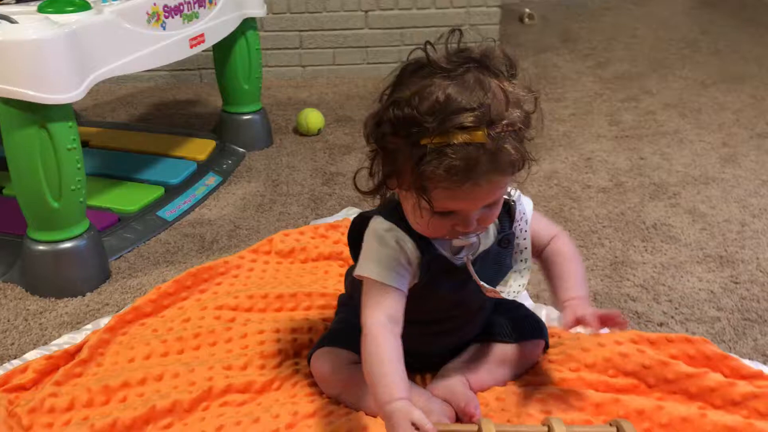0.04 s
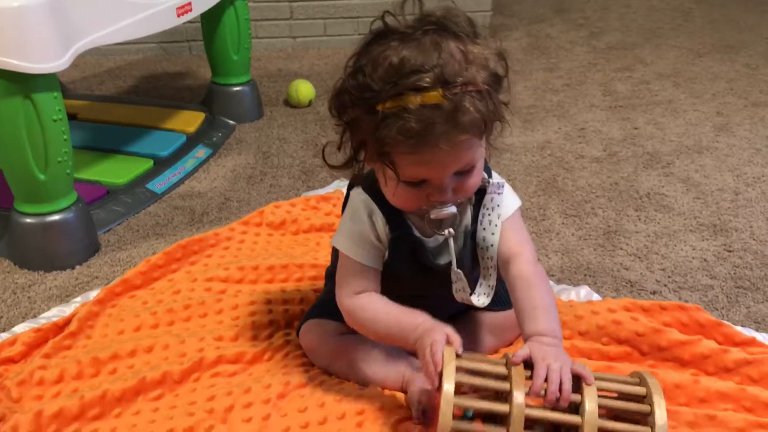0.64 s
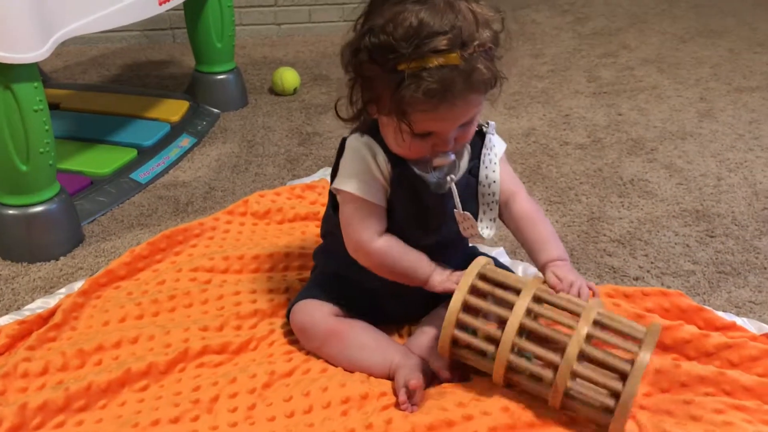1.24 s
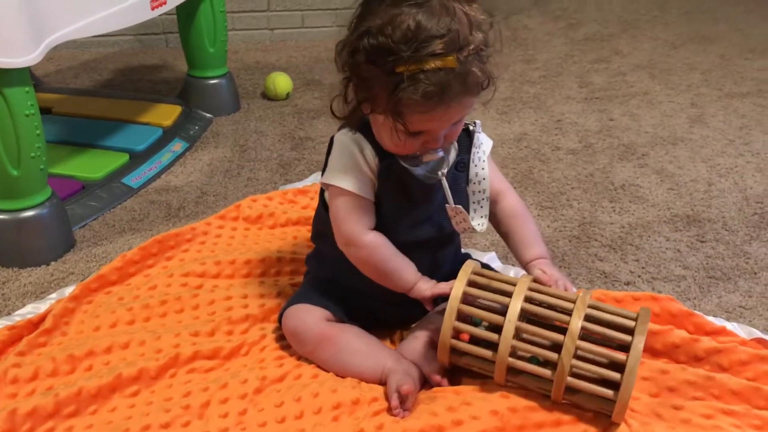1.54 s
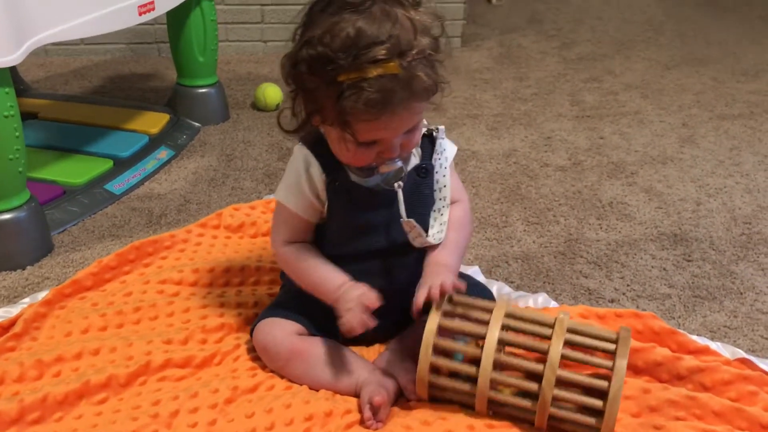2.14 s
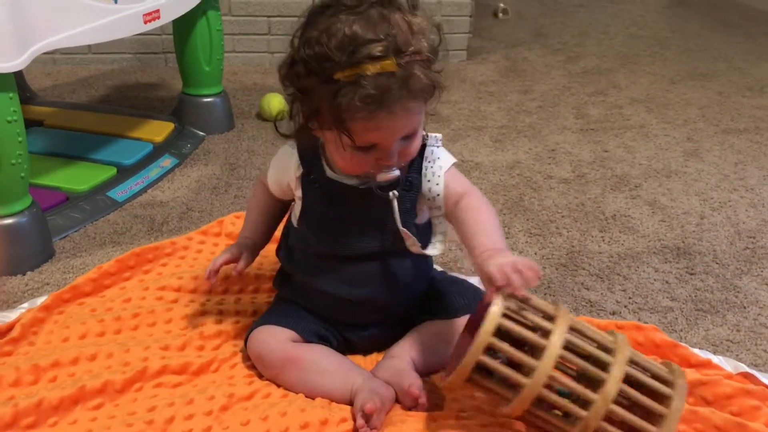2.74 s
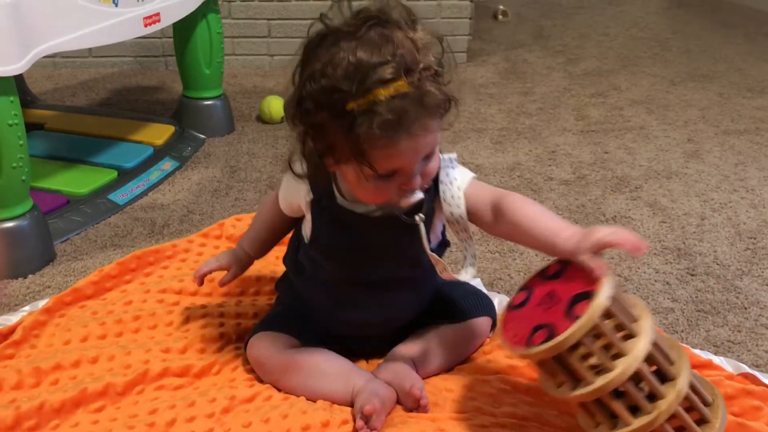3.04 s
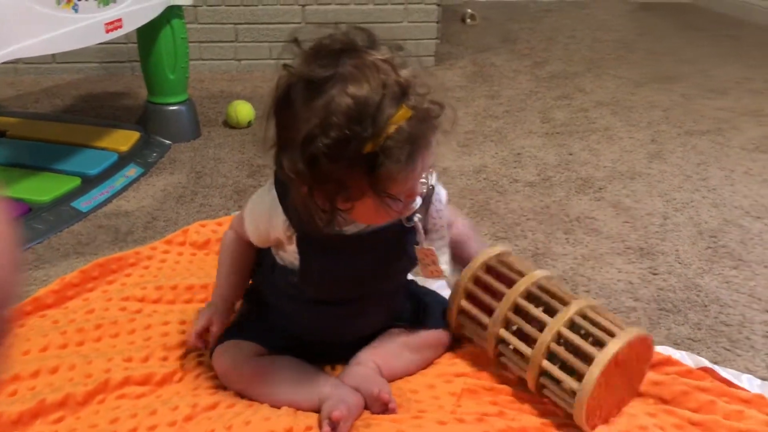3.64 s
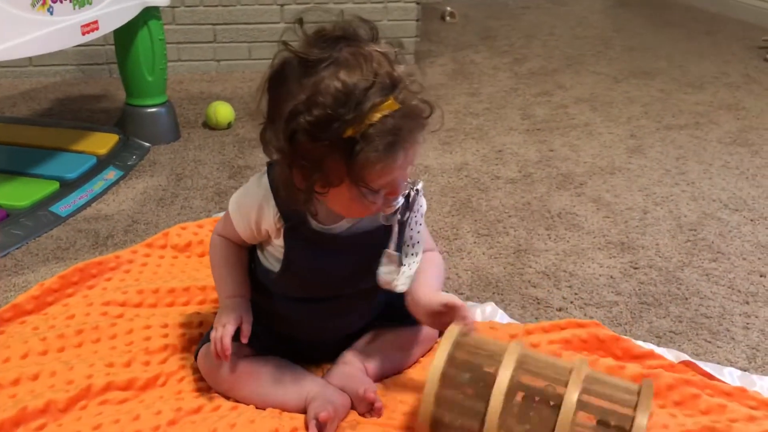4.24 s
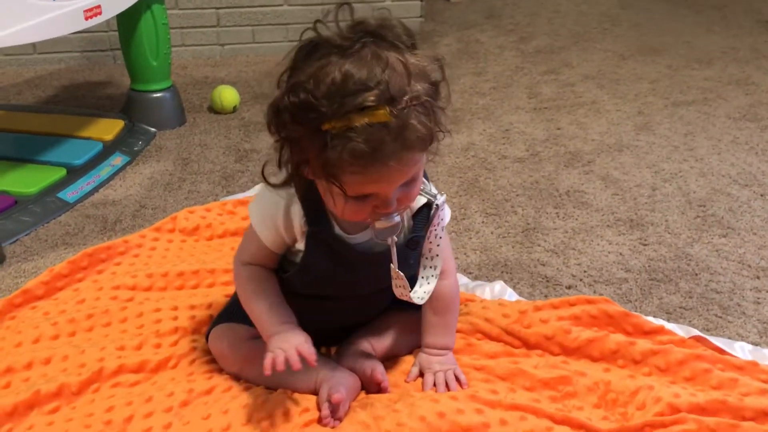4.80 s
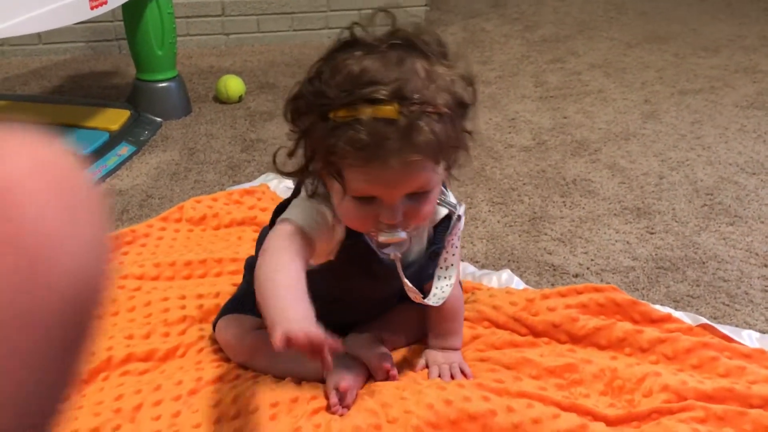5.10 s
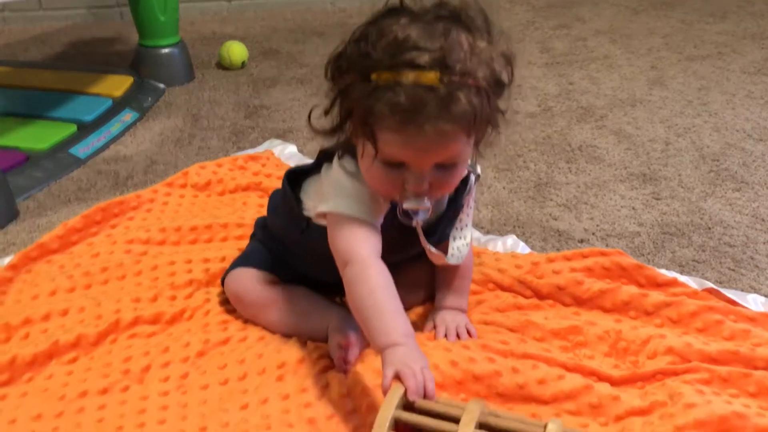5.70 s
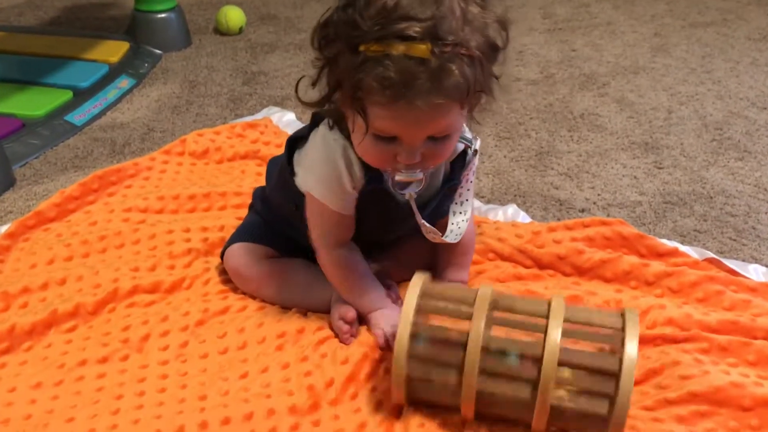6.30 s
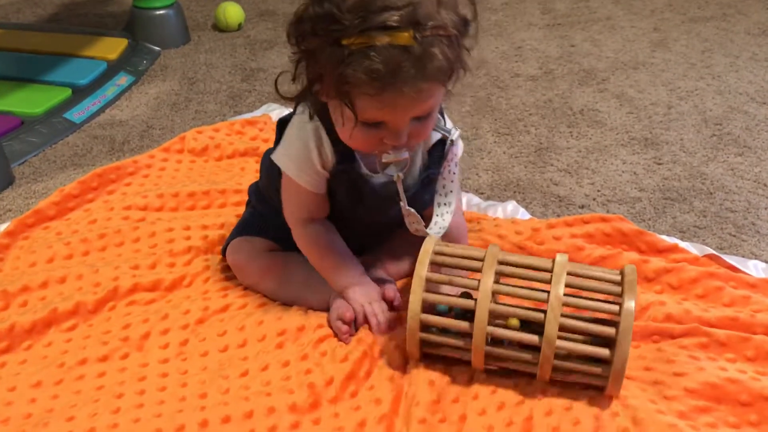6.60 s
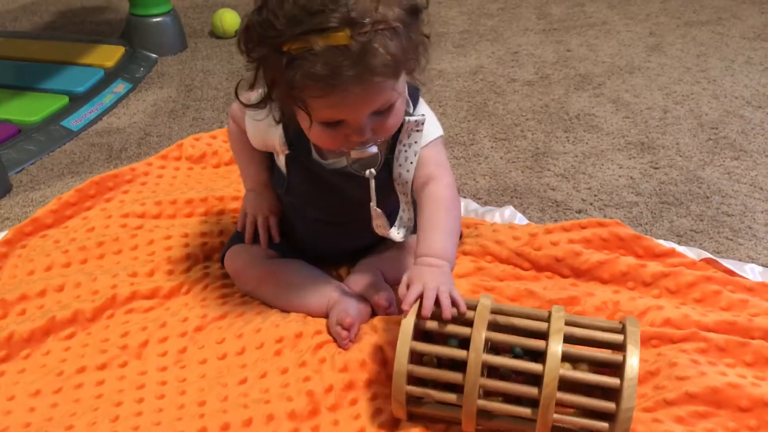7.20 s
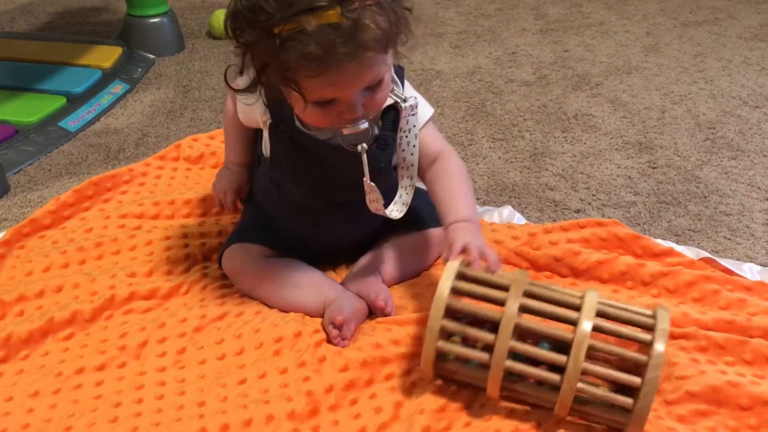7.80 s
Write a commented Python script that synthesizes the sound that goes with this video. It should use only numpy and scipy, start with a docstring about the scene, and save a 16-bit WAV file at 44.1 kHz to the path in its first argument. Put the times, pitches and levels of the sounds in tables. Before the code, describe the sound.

In a quiet carpeted room, beads tumble through a wooden rainmaker close to the microphone. After some faint metal clinks and echoing bangs further off, the first rattle swells and trickles away. Hands brush softly over the toy, then longer, louder pours follow, with a quick cluster of ringing wooden taps. One more bright rush of beads and a smaller rattle die down into scattered clicks.

```python
"""Over a faint house rumble, something clinks and bangs a few times in an echoing room further off.
Close by, a toddler tips and rolls a wooden rainmaker on a blanket: every tilt sends beads down between
its rods in a pour that swells, runs down and dulls, until the last ones drop in single clicks.
Each bead rings a rod and the wooden cage around it. Hands slide over wood and cloth between pours."""
import sys
import numpy as np
from scipy import signal
from scipy.fft import rfft, irfft, next_fast_len
from scipy.io import wavfile
from scipy.ndimage import uniform_filter1d

SR = 44100
rng = np.random.default_rng(int(sys.argv[2]) if len(sys.argv) > 2 else 0)


def waveform_to_disk(signal):
    """Save audio, clipped to [-1, 1], as 16-bit WAV at the path in sys.argv[1]."""
    frames = np.transpose(np.atleast_2d(signal))
    scaled = np.clip(frames, -1, 1) * 32767
    samples = np.round(scaled).astype(np.int16)
    wavfile.write(sys.argv[1], SR, samples)


N = 350595
TIME = np.arange(N) / SR
GRAIN = 1024  # samples in one contact


def amp(db):
    """Decibels to gain."""
    return 10 ** (np.asarray(db) / 20)

def unit(x):
    """Each row at rms 1."""
    return x / np.sqrt(np.mean(x ** 2, axis=-1, keepdims=True) + 1e-20)

def along(points, hz):
    """(Hz, value) points read on a log frequency axis."""
    knots, values = np.transpose(points)
    return np.interp(np.log(hz + 1), np.log(knots + 1), values)

def curves(rows, times):
    """Automation lanes: each column after the first, read at the given times."""
    knots, *lanes = np.transpose(rows)
    return [np.interp(times, knots, lane) for lane in lanes]

def swell(middle, length):
    """A bell-shaped fade in and out."""
    return np.exp(-(2 * (TIME - middle) / length) ** 2)

def wander(size):
    """A random curve of rms 1 that drifts over this many samples."""
    return unit(uniform_filter1d(rng.standard_normal(N), size=size))

def resonances(modes):
    """The frequency response of a bank of (Hz, width Hz, dB) resonators."""
    return lambda f: sum(amp(db) * 1j * f * width / (hz * hz - f * f + 1j * f * width)
                         for hz, width, db in modes)

def filtered(x, response):
    """x through an EQ given as a function of frequency."""
    size = next_fast_len(len(x) + SR // 4)
    return irfft(rfft(x, size) * response(np.fft.rfftfreq(size, 1 / SR)), size)[:len(x)]

def coloured(x, spectrum):
    """Rows of x through a minimum-phase EQ of (Hz, dB) points, at rms 1."""
    length = x.shape[-1]
    size = 2 * next_fast_len(length // 2 + 1)
    cepstrum = irfft(np.log(amp(along(spectrum, np.fft.rfftfreq(size, 1 / SR)))))
    cepstrum[1:size // 2] *= 2
    cepstrum[size // 2 + 1:] = 0
    return unit(irfft(rfft(x, size) * np.exp(rfft(cepstrum)))[..., :length])

def placed(times, gains, sounds):
    """Rows of sounds mixed onto the timeline, each at its time and gain."""
    sounds = gains[:, None] * sounds
    index = np.round(times * SR).astype(int)[:, None] + np.arange(sounds.shape[1])
    return np.bincount(index.ravel(), sounds.ravel(), N)[:N]

def tail(room):
    """A second of diffuse reverb in which each frequency dies at its own speed."""
    hz, t, noise = signal.stft(rng.standard_normal(SR), SR, nperseg=256)
    decay = amp(-60 * t / along(room, hz)[:, None])
    return signal.istft(noise * decay, SR, nperseg=256)[1][:SR]


# room tone EQ: (frequency [Hz], gain [dB])
HOUSE_EQ = [(20, -36.5), (45, -3.5), (70, 3), (200, -9.5), (450, -16), (1000, -17), (5000, -26.5),
            (16000, -36.5)]
def house():
    """The bed: a steady low rumble and a little hiss."""
    return amp(-56) * coloured(rng.standard_normal(N), HOUSE_EQ)

# toy and child shift their weight: (middle [s], length [s], level [dB], pitch [Hz])
WEIGHT_SHIFTS = [(3.23, 0.74, -58.5, 127), (5.677, 0.56, -56, 81.9)]
def floor(width_hz):
    """Shifting weight makes the carpeted floor rumble softly."""
    out = np.zeros(N)
    for middle, length, db, hz in WEIGHT_SHIFTS:
        band = resonances([(hz, width_hz, 0)])
        rumble = unit(filtered(rng.standard_normal(N), lambda f: band(f) ** 2))
        out += amp(db) * swell(middle, length) * rumble
    return out

# reverb of the far room: (frequency [Hz], t60 [s])
FAR_DECAY = [(150, 1), (900, 1), (2800, 0.56), (9000, 0.87)]
def far_ring(response):
    """A struck object's resonances, smeared by the far room's reverb."""
    return unit(filtered(tail(FAR_DECAY), response))

# EQ of a bang's noise: (frequency [Hz], gain [dB])
BANG_EQ = [(50, -40.5), (110, -5), (420, -7), (850, 0.5), (1500, -1), (2300, -6), (5800, -16),
           (10000, -51.5)]
# the hollow thing that bangs: (frequency [Hz], width [Hz], gain [dB])
HOLLOW_MODES = [(289, 86, 3), (854, 170, 6), (1388, 100, 4.5), (1670, 130, 4.5), (1986, 45, 4.5)]
# bang cues: (time [s], level [dB], low-pass edge [Hz])
BANG_CUES = [(0.334, -56.5, 1080), (.462, -45, 4470), (0.488, -48.5, 3000), (0.821, -56.5, 3550),
             (0.973, -51.5, 2610), (6.046, -62, 1504), (7.646, -43.5, 2720)]
def distant_bangs():
    """Something hollow bangs further off: a brief first arrival, then a long, uneven echo."""
    arrival = 1 + 0.54 * np.exp(-np.arange(SR) / SR / 0.034)
    hollow = lambda f: sum(np.abs(resonances([mode])(f)) ** 2 for mode in HOLLOW_MODES)

    def bang(edge_hz):
        body = coloured(tail(FAR_DECAY), BANG_EQ) + 0.7 * far_ring(hollow)
        body *= amp(2 * wander(size=300)[:SR])
        return unit(arrival * filtered(body, lambda f: 1 / np.sqrt(1 + (f / edge_hz) ** 3)))

    times, db, edges = np.transpose(BANG_CUES)
    return placed(times, amp(db), [bang(hz) for hz in edges])

# the clinking metal: (frequency [Hz], width [Hz], gain [dB])
METAL_MODES = [(1570, 600, 4), (2860, 280, 5.5), (4900, 190, 4), (5650, 87, 4), (6560, 57, 2.5),
               (8360, 200, -7), (9500, 130, -18)]
# clink cues: (time [s], level [dB])
CLINK_CUES = [(0.091, -60.5), (0.334, -60)]
def distant_clinks():
    """Struck metal rings in the far room."""
    times, db = np.transpose(CLINK_CUES)
    return placed(times, amp(db), [far_ring(resonances(METAL_MODES)) for _ in times])

# squeak cue: (middle [s], length [s], level [dB], pitch [Hz])
SQUEAK_CUES = [(0.39, 0.1, -52, 3200)]
def squeak(waver):
    """A thin, slightly unsteady whistle of metal on metal."""
    warped_time = np.cumsum(1 + waver * wander(size=200)) / SR
    return sum(amp(db) * swell(middle, length) * np.sin(2 * np.pi * hz * warped_time)
               for middle, length, db, hz in SQUEAK_CUES)

# strokes over wood and cloth: (middle [s], length [s], level [dB])
HAND_STROKES = [(1.97, 0.046, -55.5), (2.383, 0.38, -63), (2.856, 0.29, -56.5), (5.603, 0.19, -62.5),
                (5.948, 0.31, -56)]
# EQ of the rubbing: (frequency [Hz], gain [dB])
RUB_EQ = [(500, -33), (1700, -0.5), (4300, 0), (8200, -11), (10000, -3.5), (12000, -14)]
def hands():
    """Skin and blanket rub on the toy with a fine, uneven hiss."""
    pressure = sum(amp(db) * swell(middle, length) for middle, length, db in HAND_STROKES)
    roughness = amp(2.4 * wander(size=300))
    return pressure * roughness * coloured(rng.standard_normal(N), RUB_EQ)

# reverb around the toy: (frequency [Hz], t60 [s])
NEAR_DECAY = [(500, 0.71), (4000, 0.2), (14000, 0.27)]
# early reflection: (delay [s], gain [dB])
WALL_ECHO = [(.0095, -16.5)]
def near_room(direct):
    """A carpeted room adds one wall reflection and a weak, short tail."""
    echo = tail(NEAR_DECAY) * (1 - np.exp(-TIME[:SR] / 0.012))
    echo *= amp(-10.5) / np.linalg.norm(echo)
    for delay, db in WALL_ECHO:
        echo[round(delay * SR)] += amp(db)
    return direct + signal.fftconvolve(direct, echo)[:N]

# a soft pat on the toy: (time [s], level [dB])
PAT_CUES = [(2.099, -53.5)]
# the dull answer of the wood: (frequency [Hz], width [Hz], gain [dB])
THUD_MODES = [(262, 41, 9), (880, 140, 5.5)]
def pat(t60):
    """A palm lands on the wood: a short, dull push."""
    times, db = np.transpose(PAT_CUES)
    push = rng.standard_normal(GRAIN) * amp(-60 * TIME[:GRAIN] / t60)
    return placed(times, amp(db), unit(filtered(push, resonances(THUD_MODES))))

# knocks that leave the frame ringing: (time [s], level [dB])
FRAME_KNOCKS = [(5.272, -34), (5.336, -30), (5.404, -39.5), (5.509, -46)]
def frame(hz, t60):
    """The knocked wooden frame sounds a lower, longer note than the rods."""
    times, db = np.transpose(FRAME_KNOCKS)
    t = TIME[:SR // 8]
    envelope = amp(-60 * t / t60) * (1 - np.exp(-t / 0.0013))
    return placed(times, amp(db), np.sqrt(2) * np.sin(2 * np.pi * hz * t) * envelope)

# EQ of a contact's woody body: (frequency [Hz], gain [dB])
WOOD_EQ = [(200, -57), (1100, -14), (1500, -3), (2600, 3), (4200, 5), (5400, -2.5), (6800, -9.5),
           (10000, -30.5)]
# EQ of its hard tick: (frequency [Hz], gain [dB])
TICK_EQ = [(2000, -33), (5000, 6), (9000, 0), (10800, -8.5), (12500, -5), (16000, -17.5)]
def contacts(hz, treble_db, rod_t60, rod_db, wood_t60, tick_t60):
    """Bead on wood, one row each: the rod's note, the cage's many short modes and a hard tick."""
    t = TIME[:GRAIN]
    crack = 1 + 0.7 * np.exp(-t / 0.00052)  # the first instant is the hardest
    attack = 1 - np.exp(-t / 0.00016)  # the wood takes a moment to start ringing
    burst = lambda t60: rng.standard_normal((len(hz), GRAIN)) * amp(-60 * t / t60) * crack
    rod = unit(np.sin(2 * np.pi * hz[:, None] * t) * amp(-60 * t / rod_t60))
    purity = amp(rod_db - 0.19 * treble_db)[:, None]  # a soft contact rings little but the rod
    body = unit(attack * (purity * rod + coloured(burst(wood_t60), WOOD_EQ)))
    tick = amp(treble_db)[:, None] * coloured(burst(tick_t60), TICK_EQ)
    return unit(body + tick)

# bouncing beads: (time [s], time to rest [s], first hop level [dB], rod pitch [Hz])
BOUNCES = [(1.762, 0.22, -41.5, 4120), (3.977, 0.073, -46.5, 2507), (4.098, 0.13, -52, 2476),
           (5.693, 0.097, -52, 4600), (6.8703, 0.085, -53, 4500)]
def settling_beads():
    """A bead bounces to rest on a rod, its hops getting shorter and softer."""
    hop = np.arange(11)
    out = np.zeros(N)
    for start, duration, db, hz in BOUNCES:
        hits = contacts(np.full(len(hop), hz), treble_db=np.full(len(hop), -26.),
                        rod_t60=0.0088, rod_db=0, wood_t60=0.01, tick_t60=0.012)
        hop_db = db - 2 * hop + 2 * rng.standard_normal(len(hop))
        out += placed(start + duration * (1 - 0.845 ** hop), amp(hop_db), hits)
    return out

# the toy stands upright: (time [s], share of the blows on the cap [0-1])
CAP_SEND = [(2.5, 0), (3.25, 1), (3.58, 0.37), (3.9, 0.12)]
# the cap's ring: (frequency [Hz], width [Hz], gain [dB])
CAP_MODES = [(1187, 78, 14.5), (1947, 43, 9), (2750, 150, -4.5)]
def end_cap(beads):
    """Beads falling lengthwise drum on the cap at the bottom, which softens their tick."""
    share, = curves(CAP_SEND, TIME)
    cap = lambda f: resonances(CAP_MODES)(f) + 1 / (1 + (f / 11000) ** 4)
    return beads * (1 - share) + filtered(beads * share, cap)

# the cage rings on after each contact: (frequency [Hz], width [Hz], gain [dB])
CAGE_MODES = [(1680, 160, -9), (2580, 80, -5.5), (3840, 340, -10.5), (4370, 370, -6.5)]
def cage(beads):
    """The cage's notes blend the clicks into a rattle, coming and going as hands and blanket damp them."""
    return beads + sum(amp(2 * wander(size=5000)) * filtered(beads, resonances([mode]))
                       for mode in CAGE_MODES)

# lone clicks: (time [s], relative level [dB], rod pitch [Hz], treble share [dB])
BEAD_DROPS = [(0.773, -44, 2680, -11), (0.8918, -39.5, 3000, -6), (.904, -38, 3540, -25),
              (1.2652, -31, 2650, -10), (1.282, -33.5, 3320, 4), (1.4085, -24, 3046, -1),
              (1.6242, -31.5, 3136, -6), (2.1816, -44, 3930, -16), (2.7076, -55, 1700, -18),
              (2.8292, -43, 4550, -15), (2.9959, -28, 3580, 4.5), (3.0256, -34.5, 3870, -9),
              (3.0778, -31.5, 3400, -3.5), (3.1446, -41.5, 3440, -11), (3.1754, -48, 3467, -26),
              (3.2479, -25, 2440, 5.5), (3.318, -33.5, 2687, 1), (3.9698, -36, 2090, -28),
              (4.0558, -34.5, 2600, -11), (4.4566, -33.5, 2964, -9), (4.472, -25, 2902, -3),
              (4.9326, -24, 4400, -5.5), (5.1677, -30.5, 3360, -9), (5.2372, -31, 3365, -17),
              (5.2707, -20.5, 4405, -4.5), (5.336, -33.5, 4440, -14), (5.3839, -31, 3420, -6),
              (5.441, -37.5, 3170, -15), (5.473, -38.5, 3870, -9), (5.549, -47, 3680, -2),
              (5.7268, -43, 4565, -14), (5.767, -38, 2810, -16), (5.7849, -38.5, 4700, -19),
              (5.8826, -48.5, 2550, -14), (6.2635, -34, 3500, -27), (6.4316, -15.5, 5260, -1.5),
              (6.7166, -34, 3142, -29), (6.8242, -38, 3120, -39), (7.041, -41.5, 3810, -21),
              (7.1503, -38, 3030, -16), (7.383, -30, 3950, -13), (7.5676, -37, 2947, -17),
              (7.5848, -30, 3800, -20), (7.639, -35.5, 3940, -31)]
def single_beads(trim_db):
    """Beads that drop far enough onto a rod to stand out."""
    times, db, hz, treble_db = np.transpose(BEAD_DROPS)
    hits = contacts(hz, treble_db, rod_t60=0.011, rod_db=-0.5, wood_t60=0.024, tick_t60=0.016)
    return placed(times, amp(db + trim_db), hits)

# accents where beads land together in a pour: (time [s], relative level [dB])
BEAD_CLUMPS = [(1.1432, -36.5), (1.187, -28.5), (1.308, -29.5), (1.415, -27.5), (1.438, -28.5),
               (1.6413, -35.5), (3.3951, -30), (3.441, -30.5), (3.4856, -24.5), (3.5759, -25.5),
               (3.6406, -31), (3.6968, -32.5), (3.7455, -28), (3.7718, -20.5), (3.7818, -23.5),
               (3.8, -23.5), (3.8927, -29), (4.3439, -40), (4.3582, -34.5), (4.4918, -25.5), (4.5115, -21),
               (4.542, -23), (4.568, -23), (4.608, -23.5), (4.675, -21.5), (4.748, -24.5), (4.887, -26.5),
               (4.918, -25), (5.0102, -22), (5.069, -30.5), (6.3746, -31.5), (6.421, -23.5), (6.475, -20),
               (6.515, -19), (6.5993, -21), (6.7973, -36.5), (7.1768, -39.5), (7.2151, -32.5),
               (7.392, -30.5)]
def clump_beads(count, gap_s, fall_db):
    """Time and gain of each bead in the clumps: the leader lands first, weaker ones right behind it."""
    times, db = np.transpose(BEAD_CLUMPS)[:, :, None]
    place = np.arange(count)
    lag = gap_s * place * (0.5 + rng.random((len(times), count)))
    return (times + lag).ravel(), amp(db - fall_db * (place + 1.5)).ravel()

# one pour for each tilt of the toy:
# (start [s], build-up [s], peak level [dB], run-down [s], rod pitch [Hz], relative treble [dB])
TILTS = [(.89, 0.082, -51.5, 0.38, 3130, -1), (1.05, 0.16, -38, 0.77, 2920, -5.5),
         (1.405, 0.11, -27, 0.26, 3300, -4.5), (2.172, 0.031, -51.5, 0.19, 2015, -38),
         (2.997, 0.044, -46, 0.28, 3850, -17), (3.25, 0.24, -31, 0.39, 2610, 1.5),
         (3.731, 0.052, -32, 0.37, 2802, -2), (4.305, 0.085, -39, .25, 2600, -12.5),
         (4.502, 0.035, -23.5, 0.74, 3807, -2), (4.84, 0.2, -33, 0.43, 3984, -6),
         (6.3, 0.092, -41, .2, 3452, -8), (6.43, 0.055, -23, 0.44, 3820, -3.5),
         (6.82, 0.098, -50, 0.21, 2996, -28), (7.155, 0.06, -41.5, 0.43, 2278, -11.5),
         (7.3, 0.14, -35, 0.25, 3001, -8.5), (7.559, 0.069, -46, 0.31, 2991, -9)]
SWELL_DB_PER_S, RUN_DOWN_DB = 38, 30
DULLING = 0.46  # dB of treble share lost for each dB of run-down
def flow():
    """Time, level, rod pitch and treble of the moving beads: each pour swells, runs down and dulls."""
    start, build, peak_db, run_down, hz, treble_db = np.transpose(TILTS)[:, :, None]
    t = np.arange(0, N / SR, 0.002)
    age = t - start
    released = np.clip(age / (0.3 * build), 0, 1)  # the first beads break loose
    swell_db = -SWELL_DB_PER_S * np.maximum(build - age, 0)  # and drag more and more along
    spent_db = RUN_DOWN_DB * (np.maximum(age - build, 0) / run_down) ** 1.2  # steeper as the top empties
    power = amp(peak_db + swell_db - spent_db) ** 2 * released + 1e-12
    dulled_db = treble_db - DULLING * np.minimum(spent_db, RUN_DOWN_DB)
    total = power.sum(axis=0)
    blend = lambda value: (power / total * value).sum(axis=0)  # the loudest pour sets the tone
    return np.column_stack([t, 10 * np.log10(total), blend(hz), blend(dulled_db)])

RATE_PER_S, RATE_REF_DB, RATE_GROWTH, MOST_PER_S = 500, -30, 0.56, 1800
def collisions(flow_db):
    """Time, gain and force of random hits: the more beads move, the faster and stronger they come."""
    rate = np.minimum(RATE_PER_S * amp(RATE_GROWTH * (flow_db - RATE_REF_DB)), MOST_PER_S)
    rate *= TIME > TILTS[0][0]
    count = np.cumsum(rate) / SR
    slots = np.arange(int(count[-1]) - 2)
    times = np.interp(slots + 2 * rng.random(len(slots)), count, TIME)
    force = amp(6.96 * np.clip(rng.standard_normal(len(times)), -2, 1.7))
    force /= np.sqrt(uniform_filter1d(force ** 2, size=13))  # neighbours share their energy unevenly
    overlap = np.maximum(np.interp(times, TIME, rate), 1) * GRAIN / SR
    return times, force * amp(np.interp(times, TIME, flow_db)) / np.sqrt(overlap), force

# the notes of the rods: (pitch [Hz])
ROD_NOTES = [1608, 1880, 2140, 2602, 3112, 3884, 4420, 5330]
def pouring_beads():
    """The main rattle: loose beads and clumps each strike a rod near where the mass lands."""
    moving = flow()
    flow_db, _, _ = curves(moving, TIME)
    times, gain, force = collisions(flow_db)
    clump_times, clump_gain = clump_beads(count=3, gap_s=0.0018, fall_db=5)
    times = np.append(times, clump_times)
    gain = np.append(gain, clump_gain)
    force = np.append(force, np.ones(len(clump_times)))
    scatter = lambda spread: spread * rng.standard_normal(len(times))
    _, centre_hz, treble_db = curves(moving, times)
    aim = np.log(centre_hz) + scatter(0.28)
    nearest = np.abs(aim[:, None] - np.log(ROD_NOTES)).argmin(axis=1)
    hz = np.array(ROD_NOTES)[nearest] * np.exp(scatter(0.024))
    treble_db = treble_db - 2 + scatter(4) + 3 * np.log(force)  # harder is brighter
    rod_db = scatter(3.8) - 1.5  # a square hit rings its rod, a glancing one hardly
    hits = contacts(hz, treble_db, rod_t60=0.014, rod_db=rod_db, wood_t60=0.031, tick_t60=0.021)
    return placed(times, gain, hits)


def scene():
    """The mix: the toy close by, the rest of the house behind it."""
    around = house() + distant_bangs() + distant_clinks() + squeak(waver=0.001)
    handling = hands() + floor(width_hz=85)
    toy = pat(t60=0.0071) + settling_beads() + frame(hz=1566, t60=0.046)
    toy += cage(end_cap(single_beads(trim_db=-4.5) + pouring_beads()))
    return (near_room(toy) + around + handling)[None]

def record(dry):
    """The master: the sound cuts in just after the start, with rounded peaks and a steep low-pass."""
    start_s, ceiling, top_hz = 0.09, 0.85, 16100
    rounded = dry[0] / (1 + (dry[0] / ceiling) ** 6) ** (1 / 6)
    return filtered(rounded * (TIME > start_s), lambda hz: 1 / (1 + (hz / top_hz) ** 120))[None]


dry = scene()
out = record(dry)
waveform_to_disk(out)
```